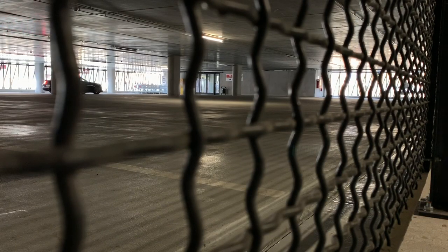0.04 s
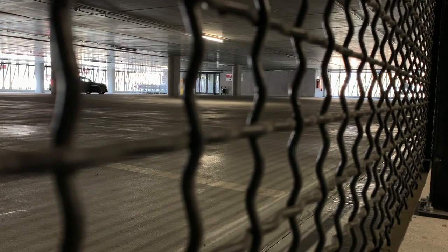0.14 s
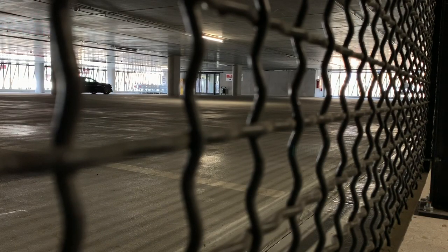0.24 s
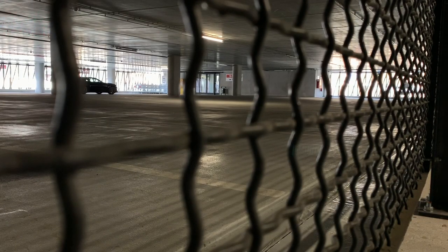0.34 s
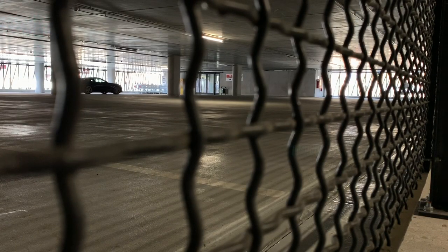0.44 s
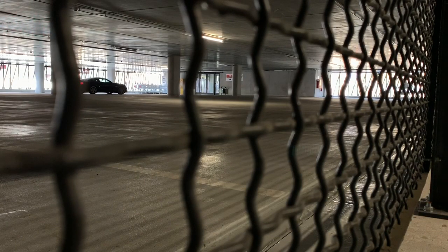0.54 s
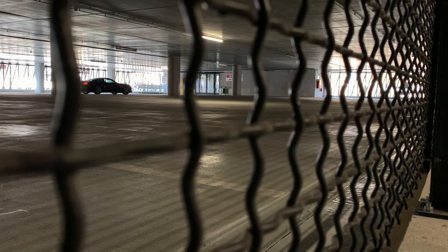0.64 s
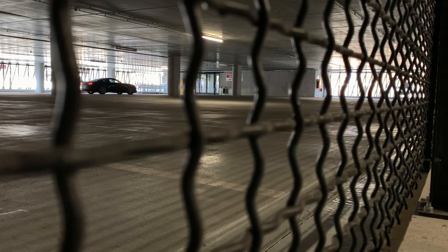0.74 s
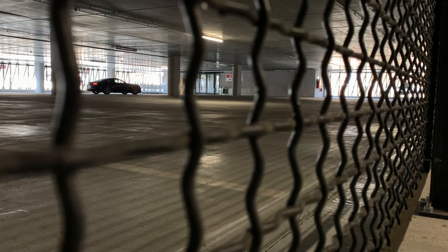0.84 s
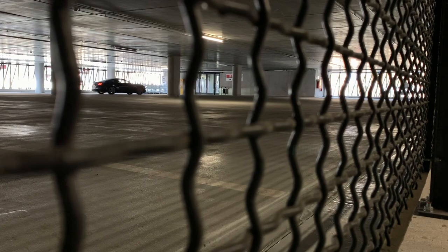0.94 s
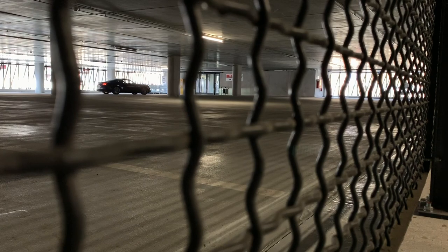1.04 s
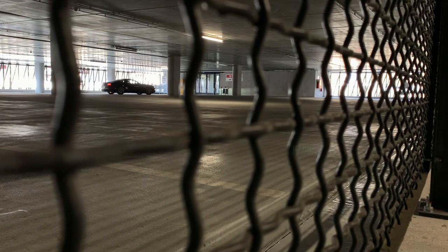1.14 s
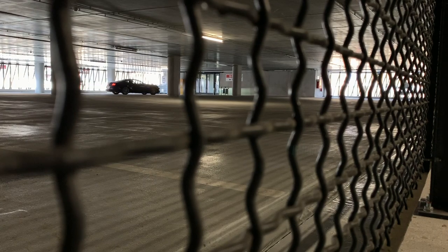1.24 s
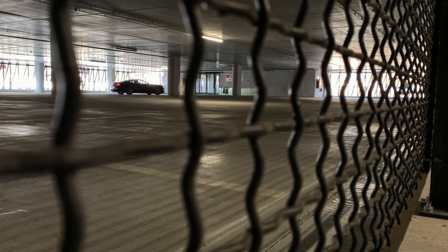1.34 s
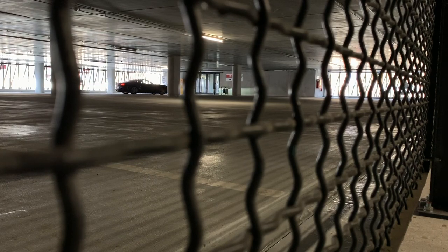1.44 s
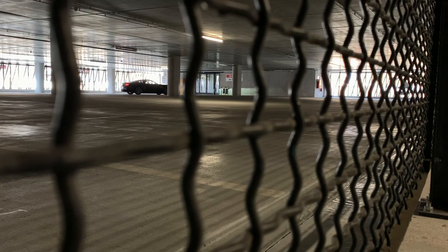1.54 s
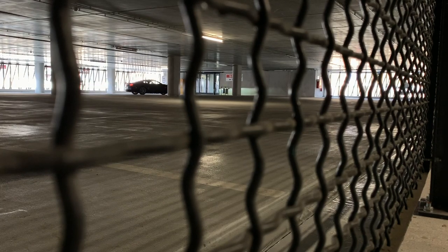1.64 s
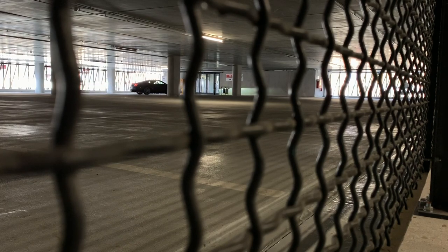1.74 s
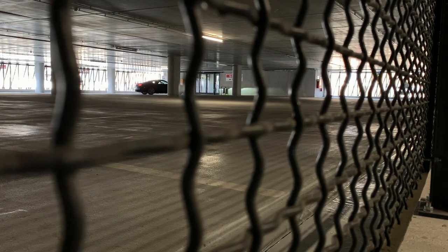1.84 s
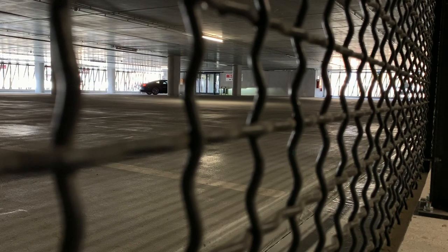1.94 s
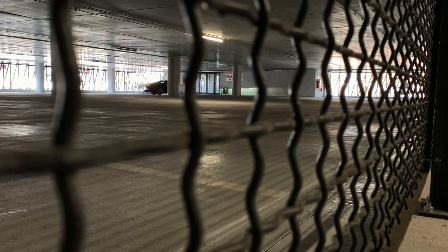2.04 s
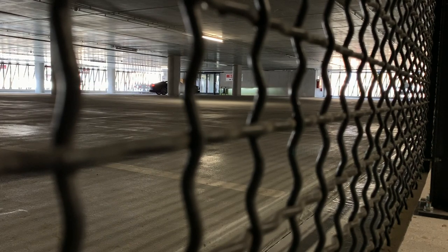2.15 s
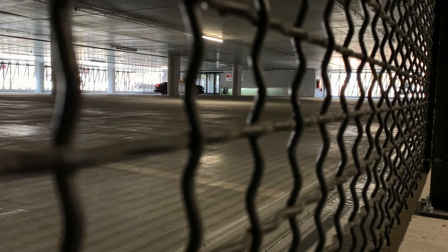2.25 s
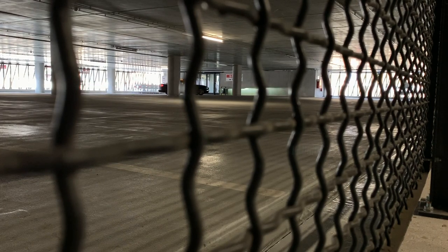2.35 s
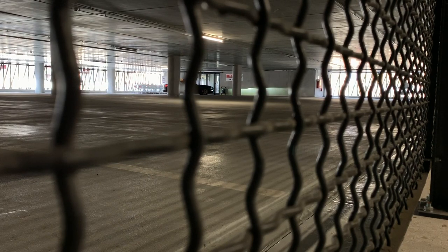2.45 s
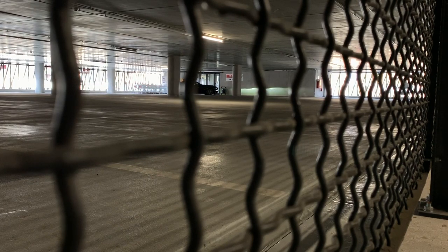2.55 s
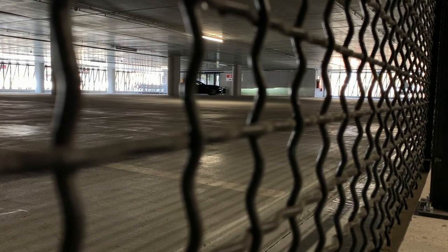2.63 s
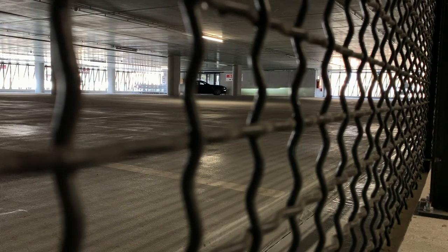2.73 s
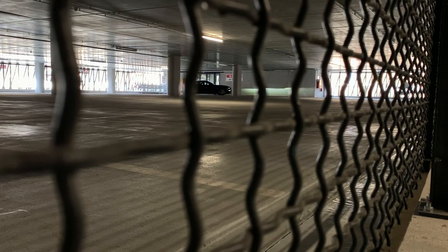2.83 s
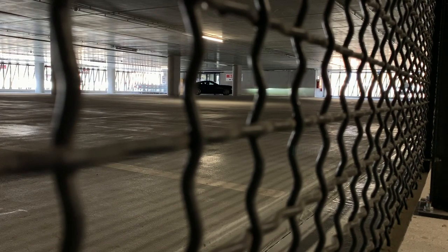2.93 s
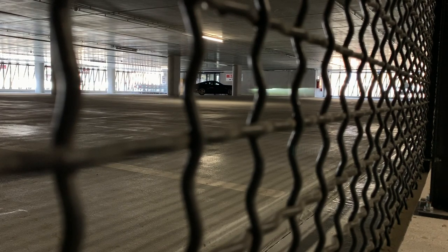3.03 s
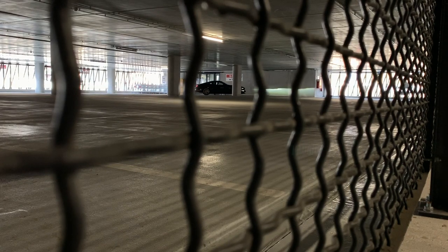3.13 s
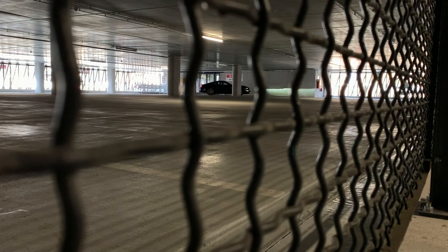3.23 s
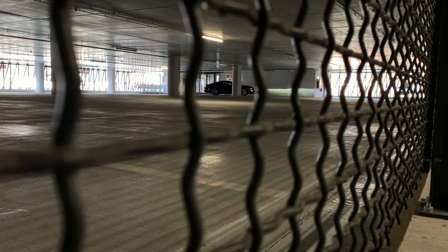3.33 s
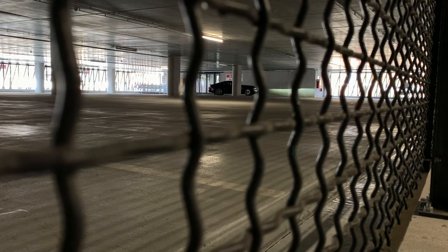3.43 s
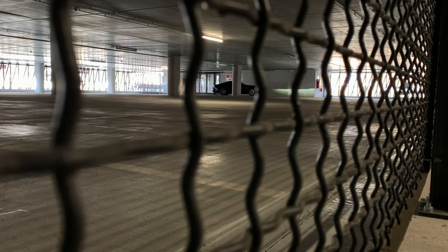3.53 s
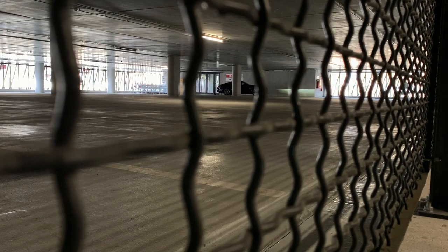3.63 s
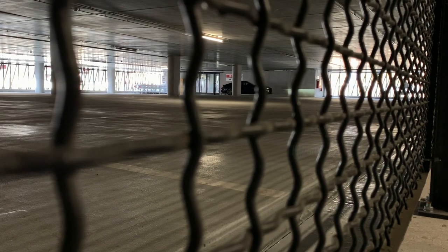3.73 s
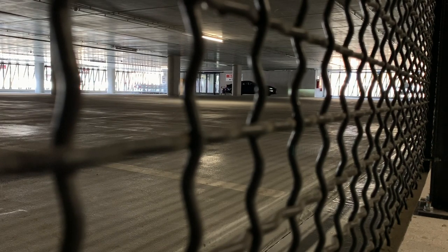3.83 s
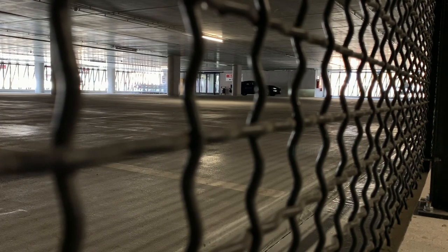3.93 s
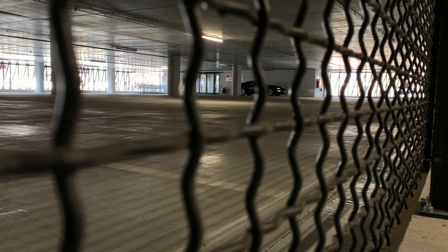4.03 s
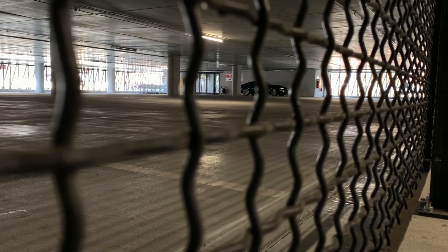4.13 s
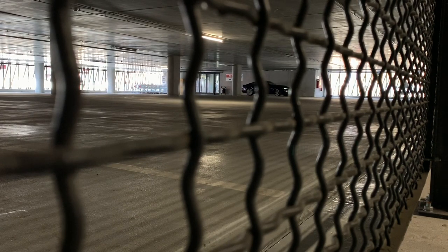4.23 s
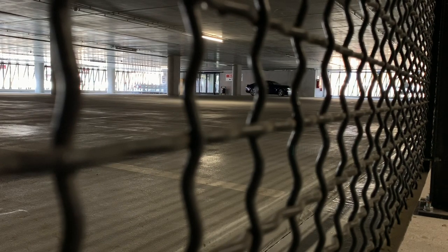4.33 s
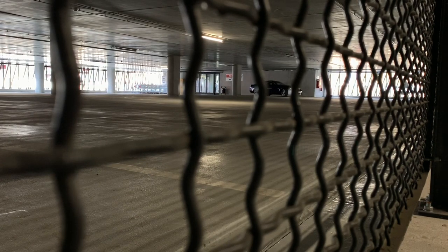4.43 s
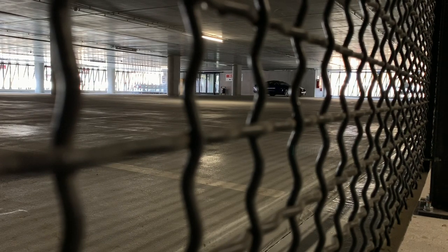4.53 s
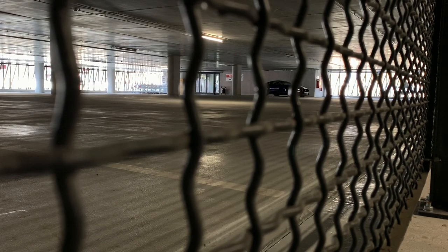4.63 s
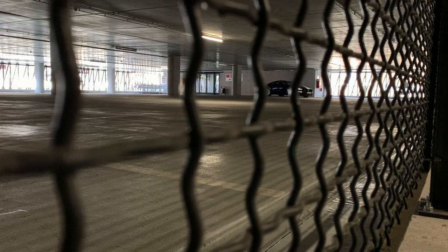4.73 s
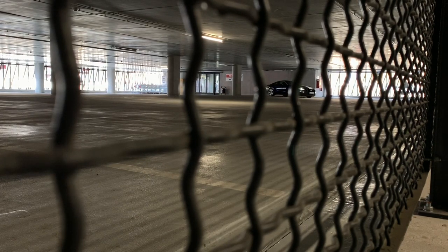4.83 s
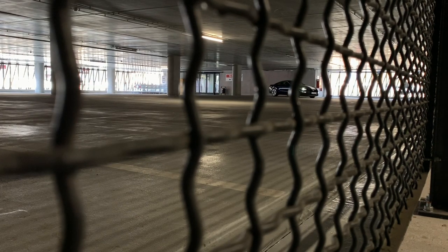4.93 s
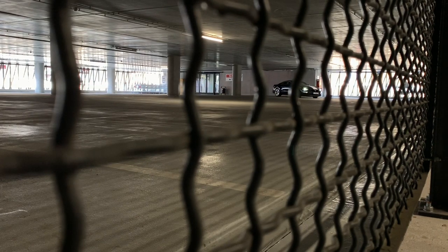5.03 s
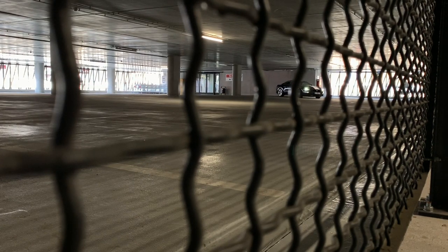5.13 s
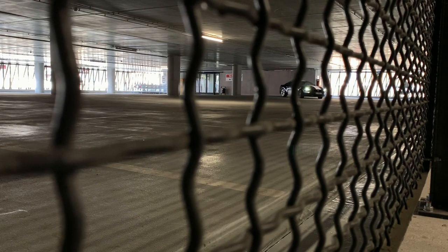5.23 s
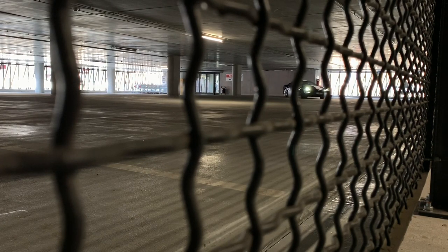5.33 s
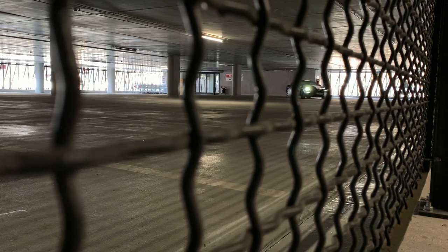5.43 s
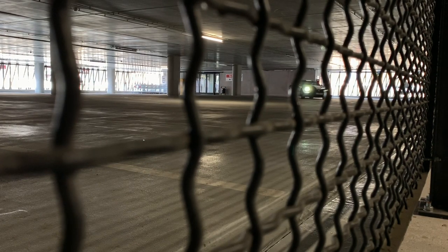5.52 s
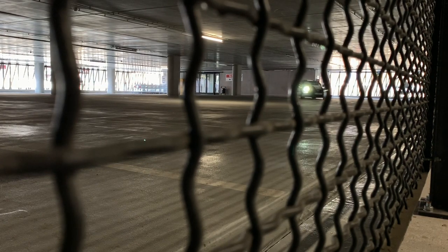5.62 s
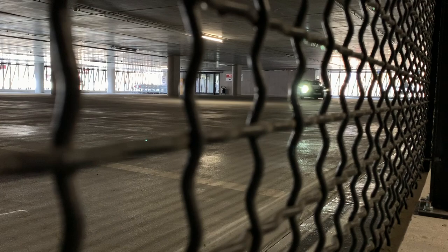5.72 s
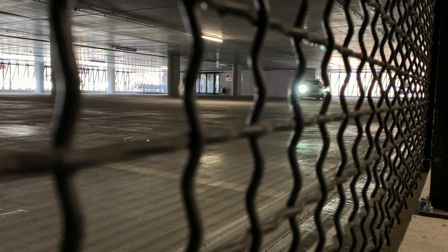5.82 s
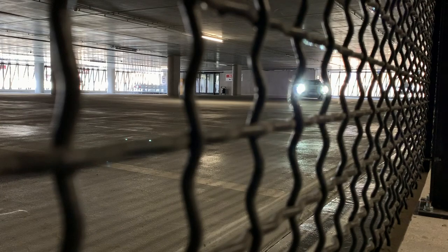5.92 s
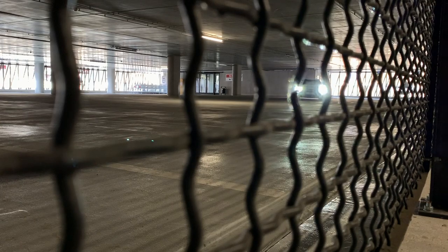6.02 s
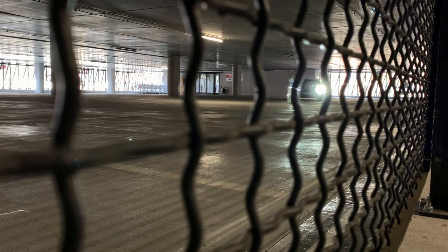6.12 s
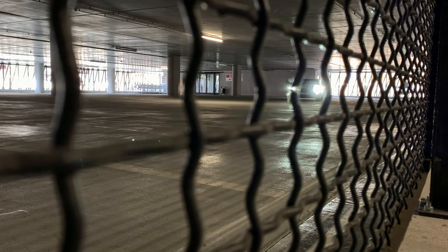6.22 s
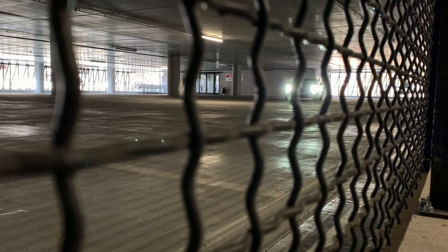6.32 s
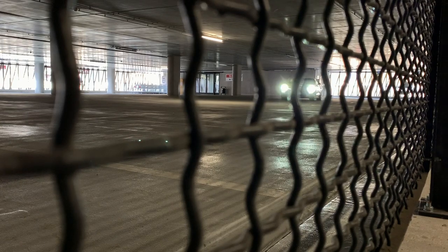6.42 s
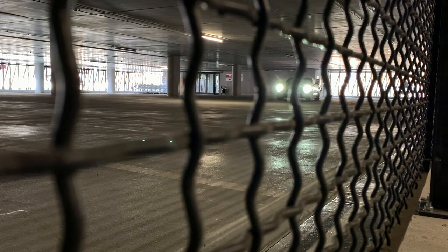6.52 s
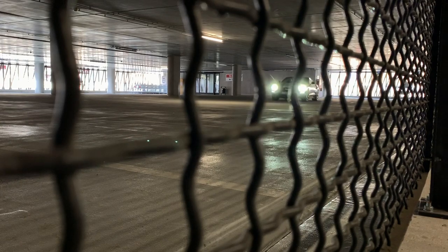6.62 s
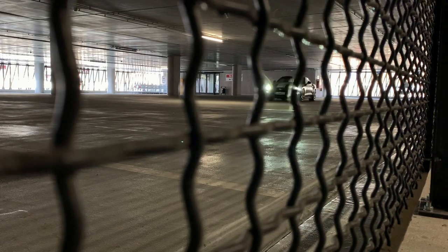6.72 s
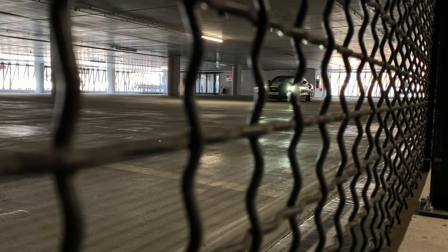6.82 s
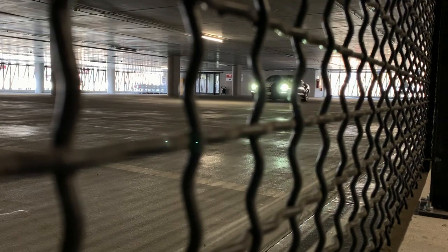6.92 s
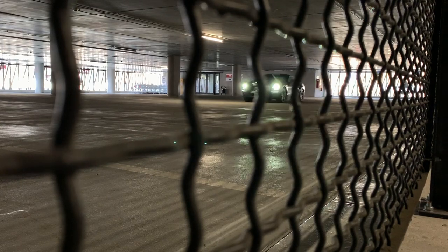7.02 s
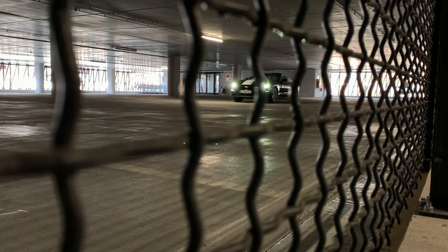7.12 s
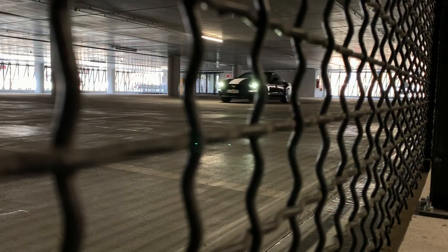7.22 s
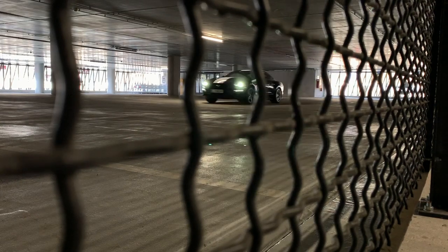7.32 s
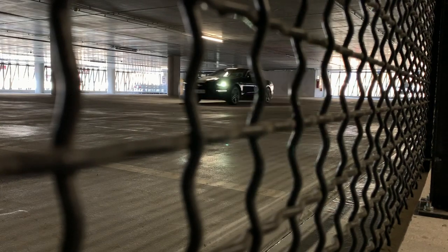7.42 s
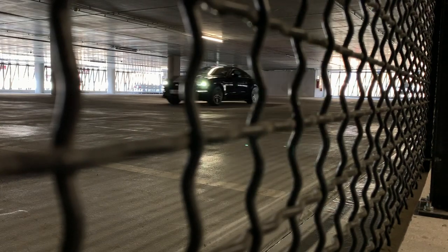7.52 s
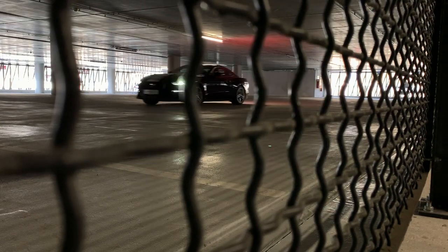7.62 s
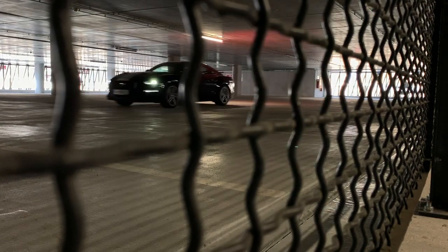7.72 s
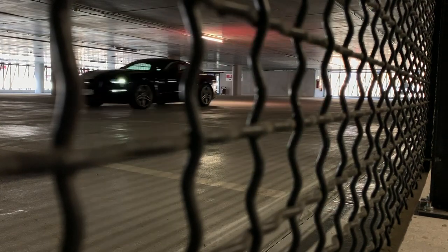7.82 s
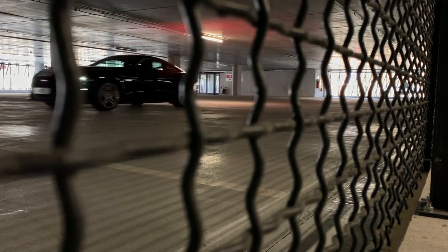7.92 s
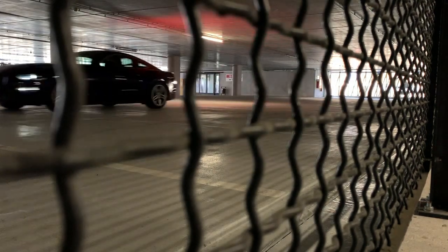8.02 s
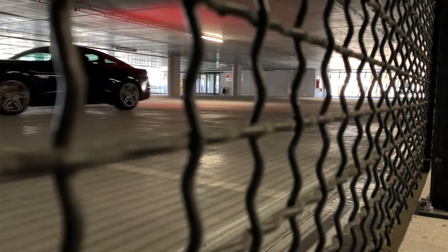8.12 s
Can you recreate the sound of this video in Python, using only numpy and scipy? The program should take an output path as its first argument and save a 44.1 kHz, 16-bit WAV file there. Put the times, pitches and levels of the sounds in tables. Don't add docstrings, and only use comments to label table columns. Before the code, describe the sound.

Fixed stereo microphone in an echoing parking garage: a far V8 mutters unevenly, gives a short throaty surge with thin rubber squeaks around it, then rumbles along more smoothly. Turning tyres sing on the concrete while revs build. In the last two seconds it accelerates close by with a hard exhaust bark, sharp tailpipe pops and bright tyre and gas rush, still loud at the end.

```python
import sys
import numpy as np
from scipy import signal
from scipy.fft import rfft, irfft, next_fast_len
from scipy.io import wavfile
from scipy.ndimage import uniform_filter1d, minimum_filter1d

SR = 44100
rng = np.random.default_rng(int(sys.argv[2]) if len(sys.argv) > 2 else 0)


def decibels_to_gain(level_db):
    exponent = np.asarray(level_db, float) / 20
    return 10 ** exponent


def bounce(signal):
    frames = np.transpose(np.atleast_2d(signal))
    limited = np.clip(frames, -1, 1)
    pcm = np.round(limited * 32767).astype(np.int16)
    wavfile.write(sys.argv[1], SR, pcm)


N = 359856

# [f/Hz, level per Hz/dB]
DECK_COLOUR = [(120, -31), (200, 2.5), (451, -6.5), (591, -4.5), (727, -11), (1020, -9), (1210, -13),
               (1540, -19.5), (6240, -52), (9000, -51.5), (11700, -78.5), (19800, -120)]
# [f/Hz, level per Hz/dB]
FAR_HISS = [(2060, -38), (3500, 0.5), (6120, -8.5), (7060, -9), (8050, -9), (10600, -23.5), (11500, -21.5),
            (13300, -45), (15500, -42)]
NEAR_HISS = [(2060, -30.5), (3500, -4), (4540, -6.5), (6050, -10), (9290, -10), (13800, -17), (15500, -24)]
# [t/s, length/s, first f/Hz, last f/Hz, width/Hz, level/dB]
BELT_SQUEAKS = [(.76, .12, 6000, 6080, 70, -66.5), (.87, .14, 6080, 6300, 80, -65),
                (.97, .13, 6280, 6550, 130, -56.5), (.93, .18, 5400, 5680, 80, -63),
                (1.06, .24, 6800, 7300, 140, -68), (1.21, .12, 5500, 5600, 80, -69),
                (.93, .4, 7450, 7950, 200, -73), (1.37, .14, 6100, 6500, 80, -58),
                (1.42, .16, 6350, 6650, 130, -61), (1.44, .19, 6200, 6350, 90, -64),
                (1.54, .22, 6600, 7100, 200, -71), (1.45, .2, 7500, 7600, 200, -70),
                (.96, .24, 13300, 13500, 1300, -74)]
# [t/s, length/s, first f/Hz, last f/Hz, width/Hz, level/dB]
TREAD_HUM = [(6.1, 1.4, 1200, 1400, 130, -47), (5.2, .8, 1400, 1380, 90, -41.5),
             (4.75, 0.42, 2100, 2380, 180, -42), (4.9, 0.41, 2520, 2380, 160, -46),
             (5.25, 0.8, 2310, 2100, 200, -42), (5.4, 0.54, 1800, 2500, 180, -46.5),
             (5.85, 0.98, 2400, 2950, 870, -36.5), (5.3, 1.8, 3880, 3500, 480, -48),
             (6.85, 1.2, 2850, 2450, 420, -33.5), (3.8, 1.8, 1950, 3600, 1400, -52),
             (1.9, 1.6, 2500, 2600, 500, -49), (6.9, 0.79, 1900, 1100, 1300, -31)]
# [t/s, length/s, lift/dB]
PILLAR_FLASHES = [
    (.9, 0.39, 2.5),
    (1.35, 0.17, 2),
    (3.68, 0.7, 1.5),
    (5.75, 0.92, 2),
    (6.48, 0.11, -1),
    (6.806, 0.12, 3),
    (6.9, 0.15, 2),
    (7.097, .3, 2),
]
# [t/s, level/dB]
NEARNESS = [(0.0, -42), (0.86, -41.5), (1.64, -38), (2.07, -39.5), (2.57, -36), (3.52, -38), (5.29, -33.5),
            (6.34, -30), (6.59, -26.5), (6.85, -27), (7.05, -21), (7.25, -21), (7.54, -20), (8.14, -26),
            (8.16, -25.5)]
# [t/s, level/dB]
EFFORT = [(0, -37), (1.06, -44.5), (1.13, -28.5), (1.62, -20), (1.9, -24.5), (2.4, -31), (3.1, -33.5),
          (3.4, -30), (3.7, -32), (4.55, -28.5), (5.1, -25), (5.75, -24.5), (6.07, -15.5), (6.32, -15.5),
          (6.6, -14), (7.0, -12), (7.4, -13.5), (8.16, -17.5)]
# [t/s, length/s, exhaust lift/dB, thud lift/dB]
THROTTLE_DABS = [(0.435, 0.61, -2.5, 2), (1.125, 0.28, 2.5, 1), (1.195, 0.82, -0.9, 4),
                 (2.195, 0.32, -1.5, 3), (3.771, 0.14, 3, 4), (3.787, .6, 4, 1), (4.292, 0.85, -3, -0.5),
                 (5.294, .8, 2.4, -6), (6.328, 0.36, 2.5, -3), (6.796, 0.17, 3, 4.5),
                 (7.195, 0.35, 4.5, -1.5), (7.898, 0.51, -2.5, -5), (6.603, 0.31, 2.5, -3.5),
                 (7.646, .35, -1, -2.5), (5.747, .25, 1, -1.5)]
# [t/s, engine cycles a second/Hz]
ENGINE_CYCLES = [(0.0, 16.5), (1.2, 16.3), (1.6, 16.1), (2.7, 17.05), (3.3, 16.95), (3.6, 16.3),
                 (4.2, 17.6), (4.7, 17.6), (5.6, 21.9), (6.1, 26.0), (6.3, 26.5), (6.55, 30.4),
                 (6.76, 31.3), (6.93, 37.2), (7.12, 42.4), (7.4, 45.6), (7.62, 43.2), (8.16, 44.3)]
# [t/s, roughness 0-1]
ROUGHNESS = [
    (0, .7),
    (1.1, .6),
    (1.6, .35),
    (2.4, .2),
    (3.4, .2),
    (3.8, .5),
    (4.2, .3),
    (5.5, .35),
    (7, .4),
    (8.16, .35),
]
CYLINDER_PULSES = [0.95, -0.068, 0.15, -0.32, 0.35, 0.29, -0.39, -0.071]
# [f/Hz, width/Hz, level/dB]
HALL_MODES = [(34.4, 16, -9.5), (53, 6, -3), (66.6, 18, -6), (86.4, 12, -4.5), (102.4, 19.6, -5)]
# [f/Hz, width/Hz, level/dB]
PIPE_MODES = [(129.8, 14, -9.5), (155.8, 21.6, -6), (184.5, 41, -4.5), (216.2, 47, -1.5), (246, 38, -2.5),
              (302.5, 34, -7.5)]
# [f/Hz, width/Hz, level/dB]
TAILPIPE_MODES = [(334, 30, -9), (371.3, 50, -1), (418, 55, -6), (483.8, 60, -12)]
# [f/Hz, width/Hz, level/dB]
SNARL_MODES = [(556, 30, -10), (614, 45, 0.5), (682.7, 42.5, 4), (743, 55, -8.5), (883, 65, -8),
               (1098, 160, -13)]
# [t/s, length/s, level/dB]
BARK_DIPS = [
    (1.95, .5, -2),
    (5.7, 2.0, -5),
    (7.62, 0.67, -4.5),
]
# [t/s, length/s, lift/dB]
SNARL_OPENS = [
    (1.45, 0.51, 4.5),
    (6.9, .25, 0.5),
    (7.6, 0.49, 3.5),
]
# [f/Hz, level per Hz/dB]
ROAR_COLOUR = [(410, -5.5), (700, -2), (745, -2.5), (926, -0.5), (1070, -6), (1370, -3), (1730, -7.5),
               (2130, -7.5), (3120, -15.5), (3680, -21.5), (4500, -30.5), (5850, -59.5), (9900, -120)]
# [t/s, peak level/dB]
PASSING_CRACKS = [(6.589, -25.5), (6.786, -16), (6.91, -18), (6.999, -25.5), (7.054, -18.5),
                  (7.174, -11.5), (7.239, -3), (7.331, -13.5), (7.365, -10), (7.489, -7.5), (7.589, -9),
                  (7.693, -14), (7.933, -14), (8.058, -23.5)]
# [t/s, length/s, f/Hz, level/dB]
STANDING_WAVES = [(1.42, 0.25, 77, -22), (1.45, 0.56, 160.4, -20.5), (1.35, 0.29, 208, -25),
                  (1.4, 0.55, 238.4, -31), (1.12, 0.12, 366, -32), (1.52, 0.19, 369, -33.5),
                  (1.45, 0.26, 403, -32), (1.8, 0.23, 372, -36), (2.03, 0.064, 366, -20),
                  (2.5, 1, 325, -35), (6.5, 0.28, 85, -21.5), (1.28, 0.31, 97.2, -19.5),
                  (1.45, .22, 104.4, -21.5), (6.24, .24, 140.8, -20.5), (6.05, 0.5, 53, -24.5),
                  (7.15, .2, 123, -20.5), (6.85, 0.42, 80, -25), (2.85, 0.27, 102, -26),
                  (2.85, 0.38, 203, -31.5), (3.15, 0.32, 217, -28), (3.78, 0.45, 225.5, -26),
                  (4.0, 0.22, 160, -21.5), (4.25, 0.29, 335, -27.5), (4.25, 0.38, 386, -32.5),
                  (4.9, 0.5, 167.6, -25), (5.2, 0.17, 189.7, -25), (5.5, 0.22, 400, -36),
                  (5.8, 0.52, 349, -26.5), (5.92, 0.28, 185.4, -19), (5.95, 0.28, 209, -25),
                  (6.1, 0.29, 160.3, -25), (6.1, 0.46, 386, -25), (6.3, 0.24, 245, -22),
                  (6.45, .3, 264, -15.5), (6.3, 0.41, 373, -22), (6.53, 0.11, 382, -10.5),
                  (6.72, .36, 184.9, -9.5), (6.6, .26, 157, -16.5), (6.72, 0.27, 357, -25),
                  (6.88, .45, 403.6, -18), (6.98, 0.54, 423, -16.5), (7.2, 0.17, 353, -26),
                  (7.25, 0.6, 488, -22), (7.45, 0.34, 344, -17.5), (7.6, .32, 368.7, -20),
                  (7.6, 0.34, 666, -26.5), (7.78, 0.33, 44.7, -24)]
ORDER_LEVELS = [-58.5, -40, -47, -42.5, -40, -37, -35.5, -34.5, -37, -36.5, -35.5, -39.5, -37]
# [t/s, length/s, order, level/dB]
ORDER_BOOMS = [(0.744, 0.4, 4, -26.5), (1, 0.4, 8, -20), (1.135, 0.19, 6, -19), (1.245, 0.45, 10, -25.5),
               (1.295, 0.74, 11, -35), (1.395, 0.5, 5, -27.5), (1.491, .4, 8, -17.5), (1.547, 0.32, 6, -31),
               (1.574, 0.29, 7, -18), (1.918, .3, 8, -18), (1.8, 1.73, 3, -22.5), (2.198, 1.1, 3, -25),
               (2.204, 0.15, 9, -27.5), (2.397, 0.41, 8, -22.5), (3.092, 0.43, 9, -25.5),
               (3.09, 0.54, 8, -23), (3.717, 0.16, 3, -19.5), (3.772, 0.25, 8, -17.5),
               (3.784, 0.29, 13, -22), (3.782, 0.25, 11, -26), (4.014, 0.34, 8, -20.5),
               (3.804, 0.94, 9, -31), (4.362, 0.35, 3, -23), (4.53, 0.25, 8, -20), (4.709, 0.49, 3, -26),
               (4.822, 0.72, 9, -26.5), (5.012, 0.55, 5, -20), (5.15, 0.49, 8, -23.5),
               (5.483, 0.49, 5, -23.5), (5.486, 0.37, 8, -23.5), (5.78, 0.19, 3, -25), (5.858, .36, 7, -18),
               (5.906, 0.68, 5, -21), (5.97, 0.4, 2, -44), (6.327, 0.15, 9, -19), (6.392, 0.23, 3, -25.5),
               (6.49, 0.38, 5, -13), (6.6, 0.26, 6, -14.5), (6.893, .14, 5, -13.5), (6.864, 0.37, 6, -22),
               (6.89, 0.19, 3, -18.5), (7.076, .45, 3, -14.5), (7.006, .3, 5, -10.5),
               (7.226, 0.2, 5, -15.5), (6.999, 0.33, 4, -25), (7.195, 0.62, 2, -17.5),
               (7.617, 0.31, 5, -12), (7.892, 0.25, 5, -16), (7.853, 0.28, 3, -20.5)]
# [f/Hz, likeness 0-1]
PORT_LIKENESS = [(30, .999), (60, .995), (85, .99), (130, .76), (200, .72), (290, .87), (640, .45),
                 (1400, .25), (3500, .2), (4500, .05), (5600, .05), (6400, .2), (7100, .965), (8100, .97),
                 (8800, .7), (9700, 1), (11600, 1), (12100, .6), (12700, .96)]
# [f/Hz, lead/half turns]
PORT_LEAD = [(6800, 0), (8100, 0), (9000, .45), (9500, .65), (9800, 1), (11500, 1), (12650, 2), (15100, 2),
             (15300, 3)]
# [f/Hz, level/dB]
PORT_TILT = [(60, -0.8), (130, -1), (290, -1), (640, 1), (1410, 2.5), (3100, 0.8), (5500, -1.5), (7500, 0),
             (15000, 0)]


def read(points, hz):
    f, value = np.transpose(points)
    return np.interp(np.log(hz + 1), np.log(f + 1), value)


def curves(rows):
    s, *columns = np.transpose(rows)
    return [np.interp(np.arange(N) / SR, s, column) for column in columns]


def evened(x):
    return x / np.sqrt(np.mean(x ** 2) + 1e-20)


def coloured(x, points):
    return irfft(rfft(x) * decibels_to_gain(read(points, np.fft.rfftfreq(N, 1 / SR))), N)


def coloured_air(points):
    return evened(coloured(rng.standard_normal((2, N)), points))


def drift(hz):
    step = np.arange(0, N + SR, SR / hz / 2)
    joined = np.interp(np.arange(N), step, rng.standard_normal(len(step)))
    return evened(uniform_filter1d(joined, int(SR / hz / 4)))


def swells(rows):
    out = np.zeros(N)
    for s, length, height in rows:
        part = out[round(s * SR):][:round(length * SR)]
        t = np.arange(len(part)) / SR
        edge_s = min(0.12, length / 2)
        ramp = np.clip(np.minimum(t, length - t) / edge_s, 0, 1)
        part += height * np.sin(np.pi / 2 * ramp) ** 2
    return out


def resonate(x, hz, width):
    turn = np.exp(2j * np.pi * np.cumsum(hz * np.ones(len(x))) / SR)
    r = np.exp(-np.pi * width / SR)
    return 2 * (turn * signal.lfilter([1 - r], [1, -r], x / turn)).real


def hall(x, t60, dry_db, moves_hz):
    x = np.r_[x[SR // 2:0:-1], x]
    size = next_fast_len(len(x) + SR)
    tails = rng.standard_normal((2, 2, SR)) * decibels_to_gain(-60 * np.arange(SR) / SR / t60)
    tails /= np.linalg.norm(tails, axis=2, keepdims=True)
    tails[:, 0, 0] += decibels_to_gain(dry_db)
    turn = np.pi * moves_hz * np.arange(len(x)) / SR
    places = x * np.array([np.cos(turn), np.sin(turn)])
    spectra = rfft(places, size)[:, None] * rfft(tails, size)
    out = irfft(spectra.sum(0), size)[:, SR // 2:SR // 2 + N]
    return out / np.sqrt(uniform_filter1d((out ** 2).mean(0), SR // 2) + 1e-12)


def patchy(x, patchy_db):
    z = signal.stft(x, nperseg=512)[2]
    patches = rng.standard_normal(z.shape[1:])
    patches = uniform_filter1d(uniform_filter1d(patches, size=4, axis=0), size=30, axis=1)
    lift = decibels_to_gain(patchy_db * np.clip(evened(patches), -2, 1.3))
    return signal.istft(z * lift, nperseg=512)[1][:, :N]


def ports(fields):
    size = next_fast_len(N + 8192)
    hz = np.fft.rfftfreq(size, 1 / SR)
    one, other = rfft(fields, size)
    same = np.clip(read(PORT_LIKENESS, hz), 0, 1)
    tilt = decibels_to_gain(read(PORT_TILT, hz) / 2)
    lead = np.exp(1j * np.pi * read(PORT_LEAD, hz))
    right = same * lead * one + np.sqrt(1 - same ** 2) * other
    return irfft(np.array([one * tilt, right / tilt]), size)[:, :N]


def deck_air():
    return decibels_to_gain(-35.5) * coloured_air(DECK_COLOUR)


def whistles(rows):
    out = np.zeros((2, N))
    chatter = decibels_to_gain(2.5 * drift(20.))
    for s, length, first_hz, last_hz, width, db in rows:
        size = int(length * SR)
        hz = np.linspace(first_hz, last_hz, size)
        fade = signal.windows.tukey(size, .7)
        for side in out:
            tone = resonate(resonate(rng.standard_normal(size), hz, width), hz, width)
            side[int(s * SR):][:size] += decibels_to_gain(db) * evened(tone) * fade * chatter[N - size:]
    return out


def belt_squeaks():
    return whistles(BELT_SQUEAKS)


def tread_hum():
    return whistles(TREAD_HUM)


def hiss(db, surge):
    near = np.clip((db + 59) / 19., 0, 1) ** 2.4
    far_air, near_air = coloured_air(FAR_HISS), coloured_air(NEAR_HISS)
    blend = np.sqrt(1 - near) * far_air + np.sqrt(near) * near_air
    return decibels_to_gain(db + 2.5 + 0.57 * surge) * blend


def roar(pulses, db, surge):
    puffs = evened(signal.lfilter([1], [1, -.99], abs(pulses)))
    gas = rng.standard_normal(N) * (1 + .5 * puffs) + 0.31 * evened(pulses)
    wash = coloured_air(ROAR_COLOUR)
    echoed = hall(coloured(gas, ROAR_COLOUR), t60=0.61, dry_db=-16.5, moves_hz=2.5)
    return decibels_to_gain(db - 3.5 + .25 * surge) * (echoed + wash)


def cracks():
    t60_s, rise_s, trim_db = .17, .003, -7
    out, t = np.zeros((2, N)), np.arange(SR // 5) / SR
    for s, db in PASSING_CRACKS:
        t = t[:N - round(s * SR)]
        shape = decibels_to_gain(db + trim_db - 60 * t / t60_s) * np.minimum(t / rise_s, 1)
        out[:, round(s * SR):][:, :len(t)] += shape * rng.standard_normal((2, len(t)))
    colour_power = np.mean(decibels_to_gain(2 * read(ROAR_COLOUR, np.fft.rfftfreq(4096, 1 / SR))))
    return coloured(out, ROAR_COLOUR) / np.sqrt(colour_power)


def rings():
    waver_db, waver_rad, second_field_db = 1.8, .45, -5
    out, t, waver = np.zeros((2, N)), np.arange(N) / SR, drift(7.)
    for k, (s, length, hz, db) in enumerate(STANDING_WAVES):
        span = slice(round(s * SR), round((s + length) * SR))
        slow = np.roll(waver, 9001 * k)[span]
        sway = np.roll(waver, -13001 * k - 5000)[span]
        size = swells([(s, length, 1)])[span] * decibels_to_gain(db + waver_db * slow)
        phase = 2 * np.pi * hz * t[span] + waver_rad * sway + 7 * rng.random((2, 1))
        out[:, span] += size * np.cos(phase) * decibels_to_gain(np.array([[0], [second_field_db]]))
    return out


def booms(cycles_hz, effort_db):
    follow, wander_db = 0.39, 4
    turns = 2 * np.pi * np.cumsum(cycles_hz) / SR
    waver, wander = drift(7.3), drift(2.3)
    waver = np.r_[waver, waver[::-1]]
    wander = np.r_[wander, wander[::-1]]
    lines = np.zeros(N)
    for k, order_db in enumerate(ORDER_LEVELS, 1):
        size = decibels_to_gain(order_db + follow * (effort_db + 30) + wander_db * wander[27001 * k:][:N])
        size += swells([(s, length, decibels_to_gain(db)) for s, length, order, db in ORDER_BOOMS if round(order) == k])
        size *= decibels_to_gain(1.0 + 0.91 * waver[9001 * k:][:N])
        sway = 0.25 * waver[N - 7001 * k:][:N]
        lines += size * np.cos(k * turns + sway + 7 * rng.random())
    late = int(0.043 * SR)
    return np.array([lines, 0.42 * np.r_[lines[late:0:-1], lines][:N]])


def firings(cycles_hz):
    count = np.floor(np.cumsum(8 * cycles_hz) / SR).astype(int)
    at = np.flatnonzero(np.diff(count)) + 1
    rough = curves(ROUGHNESS)[0][at]
    size_chance, time_chance = rng.standard_normal((2, len(at)))
    late = (rough * time_chance * 0.00081 * SR).astype(int)
    where = np.clip(at + late, 0, N - 1)
    out = np.zeros((2, N))
    out[0, where] = np.array(CYLINDER_PULSES)[count[at] % 8]
    out[1, where] = 1.35 * rough * size_chance
    return out


def pipes(drive, modes, band, db, t60, dry_db, moves_hz):
    hz = np.fft.rfftfreq(N, 1 / SR)
    ring = sum((-1) ** k * decibels_to_gain(g) / (1 + 2j * (hz - f) / w) for k, (f, w, g) in enumerate(modes))
    rung = irfft(rfft(drive) * ring * decibels_to_gain(read(band, hz)), N)
    return decibels_to_gain(db) * hall(rung, t60, dry_db, moves_hz)


def hall_thud(drive, db):
    drive = evened(drive) + 0.97 * rng.standard_normal(N)
    band = [(18, -23.0), (30, -3.0), (110, 5.0), (160, -20.5)]
    return pipes(drive, HALL_MODES, band, db, t60=1.0, dry_db=-1.0, moves_hz=0.359)


def exhaust_rumble(drive, db):
    band = [(70, -33.0), (110, 8.0), (280, -4), (400, -32.5)]
    return pipes(drive, PIPE_MODES, band, db, t60=0.85, dry_db=-6.0, moves_hz=1.5)


def tailpipe_bark(drive, db):
    band = [(200, -21.5), (290, 4.5), (540, -1.0), (800, -12.5)]
    return pipes(drive, TAILPIPE_MODES, band, db, t60=1.39, dry_db=-13.0, moves_hz=2.5)


def load_snarl(drive, db):
    band = [(400, -17.0), (520, -6.0), (1150, -4.0), (1500, -22.0)]
    return pipes(drive, SNARL_MODES, band, db, t60=0.84, dry_db=-24.0, moves_hz=2.5)


def scene():
    effort_db, near_db, cycles_hz = curves(EFFORT)[0], curves(NEARNESS)[0], curves(ENGINE_CYCLES)[0]
    effort_db += swells([row[:3] for row in THROTTLE_DABS])

    def level(offset_db, effort_share, near_share):
        return offset_db + effort_share * effort_db + near_share * near_db

    rumble_db = level(-9.5, 0.68, -0.12) - 3 * np.maximum(np.log2(cycles_hz / 44), 0)
    thud_db = level(-22, 0.25, -0.063) + swells([(s, length, db) for s, length, _, db in THROTTLE_DABS])
    bark_db = level(1, 0.96, 0.066) + swells(BARK_DIPS)
    snarl_db = level(7.94, 0.92, 0.67) + swells(SNARL_OPENS)
    flashes_db = swells(PILLAR_FLASHES)
    roar_db = level(2.86, 0.05, .95) + 0.46 * flashes_db
    abreast_db = 5 * np.clip((np.arange(N) / SR - 7.76) / 0.52, 0, 1)
    hiss_db = level(-16.5, 0.028, 1.03) + flashes_db + abreast_db

    beat, scatter = firings(cycles_hz)
    surge = drift(14.)
    low_drive = .3 * beat + scatter
    tail_drive = .4 * beat + scatter
    rush = patchy(roar(beat + scatter, roar_db, surge) + hiss(hiss_db, surge), patchy_db=2.1)
    engine = hall_thud(low_drive, thud_db) + exhaust_rumble(low_drive, rumble_db)
    engine += tailpipe_bark(tail_drive, bark_db) + load_snarl(tail_drive, snarl_db)
    engine += booms(cycles_hz, effort_db)
    rubber = belt_squeaks() + tread_hum()
    return ports(deck_air() + rubber + rush + cracks() + rings() + engine)


def band_limit(x):
    return signal.sosfilt(signal.butter(12, 15610, fs=SR, output="sos"), x)


def record(dry):
    peak = -minimum_filter1d(-abs(dry).max(0), size=400)
    held = dry / uniform_filter1d(np.maximum(peak, 1), size=400)
    held = np.clip(held, -.99, .99)
    return band_limit(held)


dry = scene()
out = record(dry)
bounce(out)
```